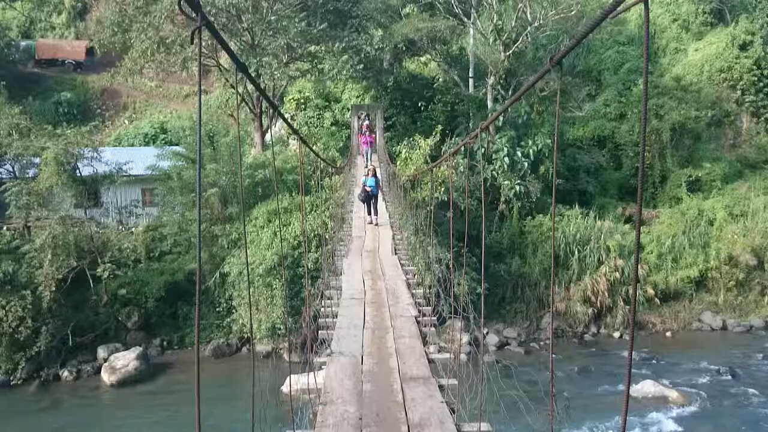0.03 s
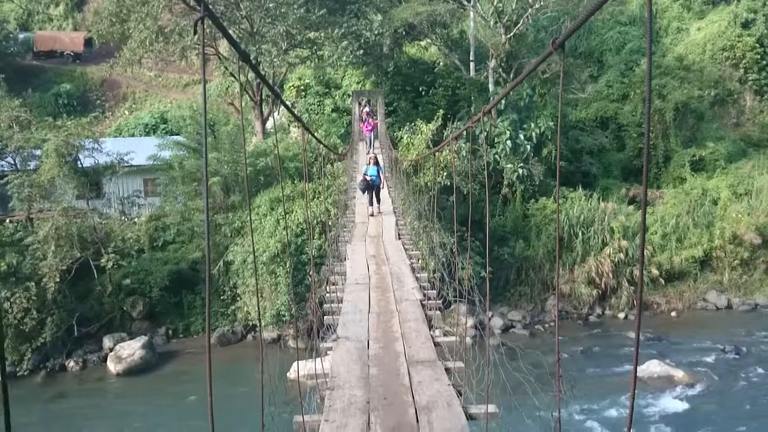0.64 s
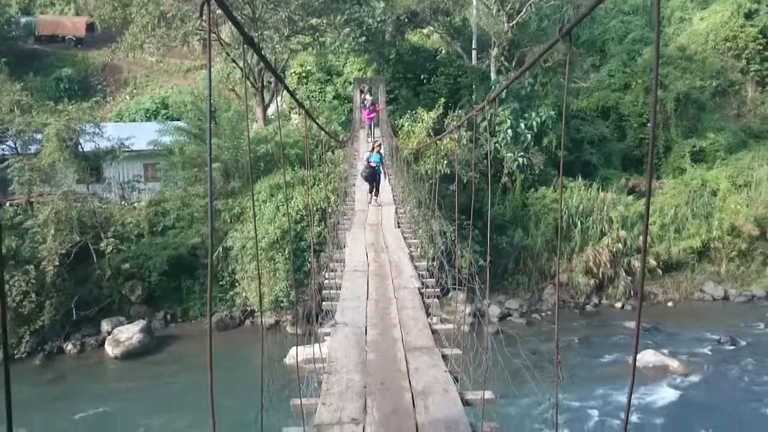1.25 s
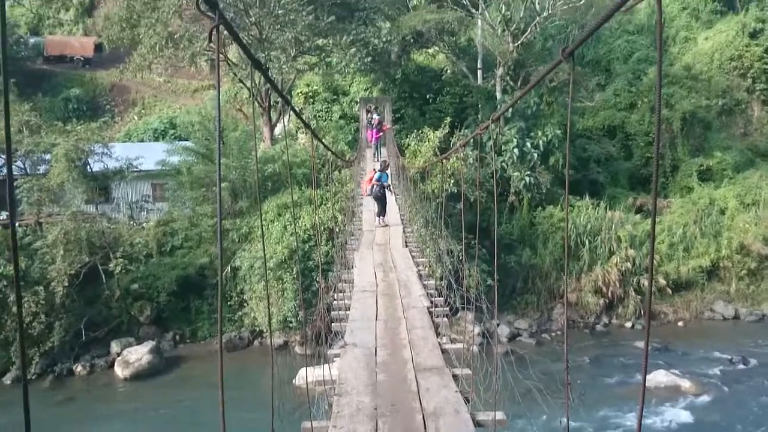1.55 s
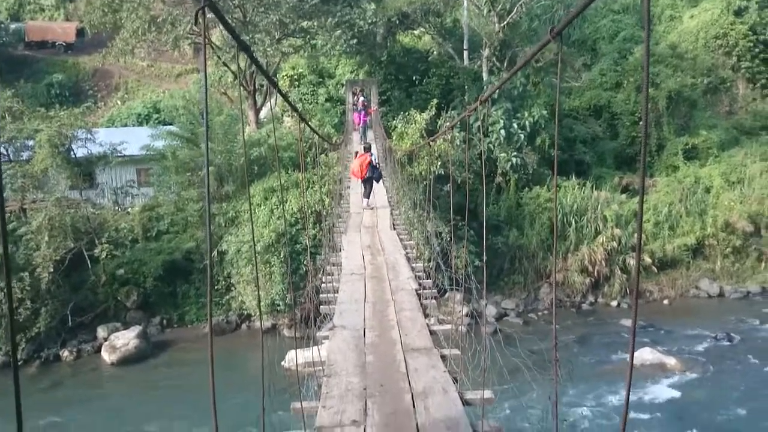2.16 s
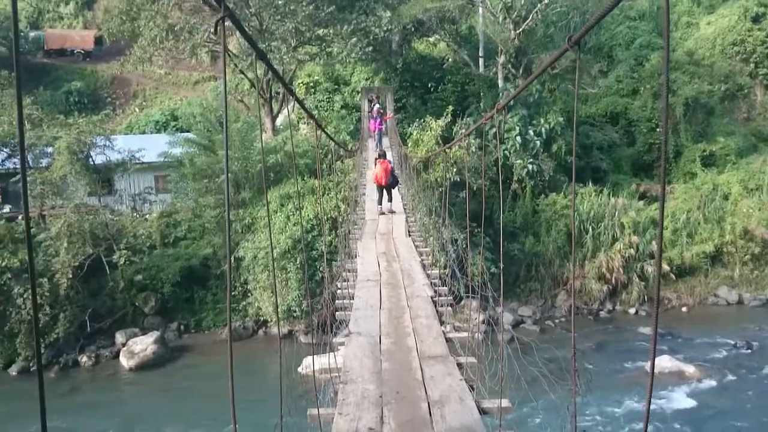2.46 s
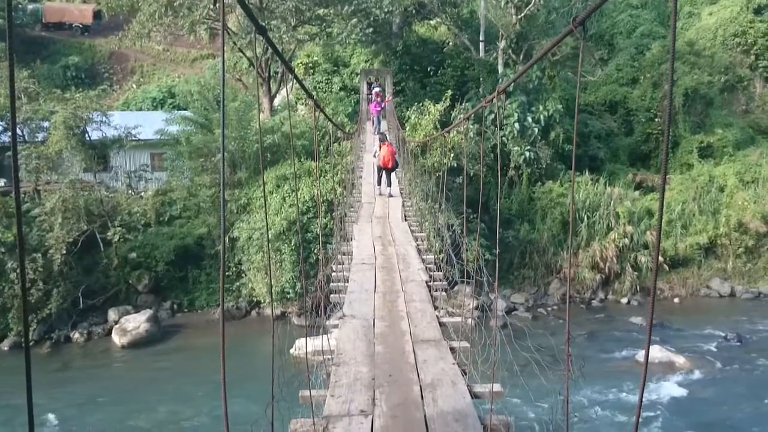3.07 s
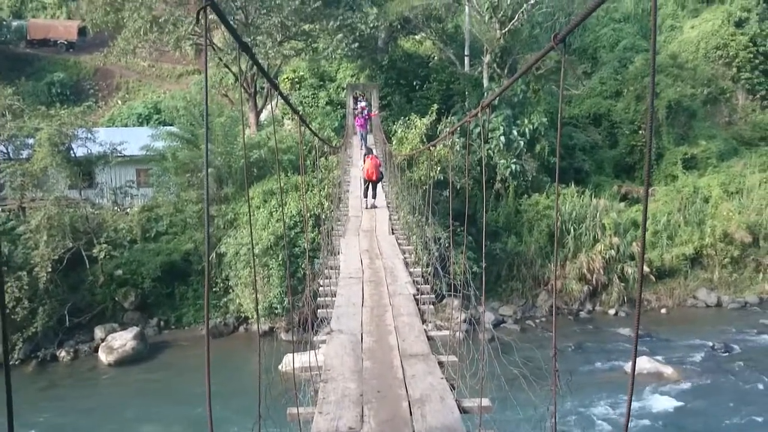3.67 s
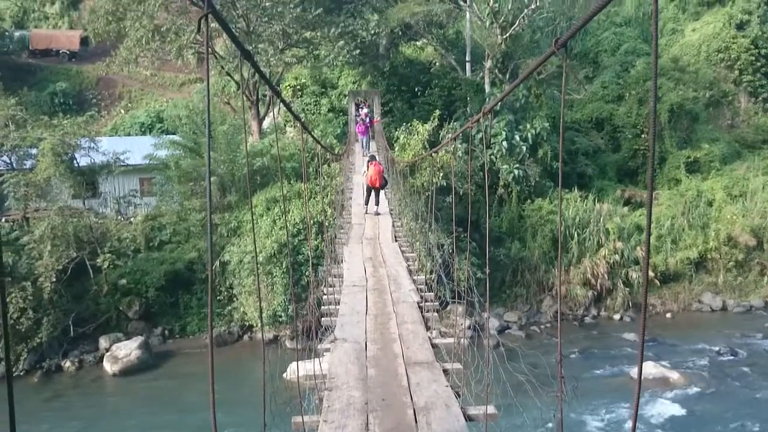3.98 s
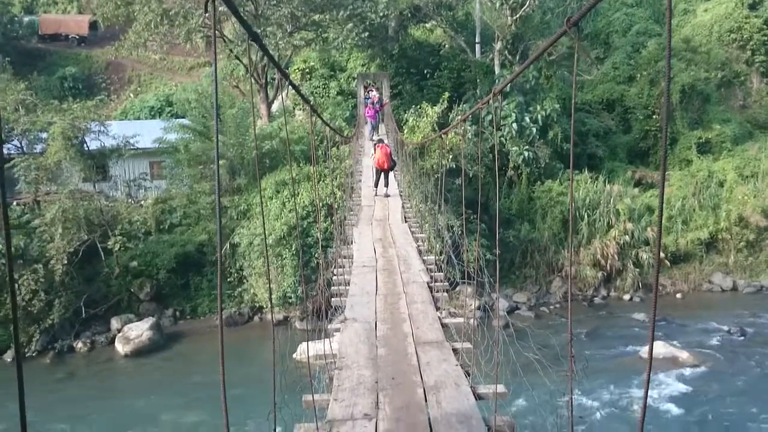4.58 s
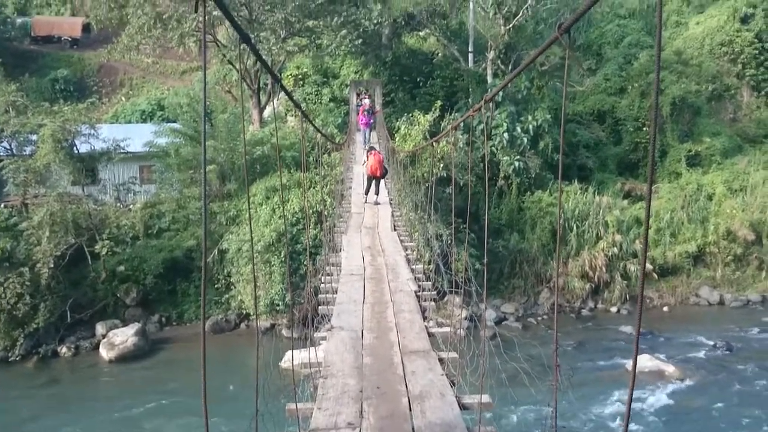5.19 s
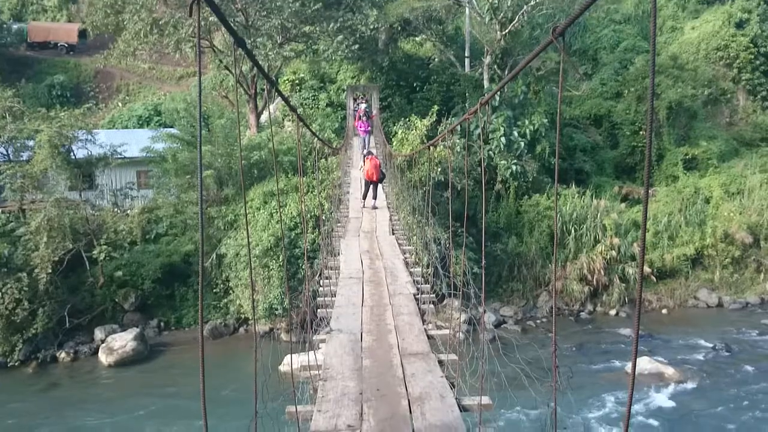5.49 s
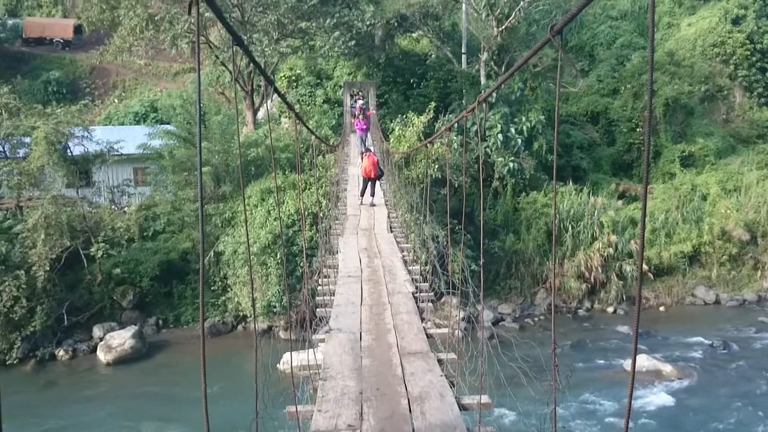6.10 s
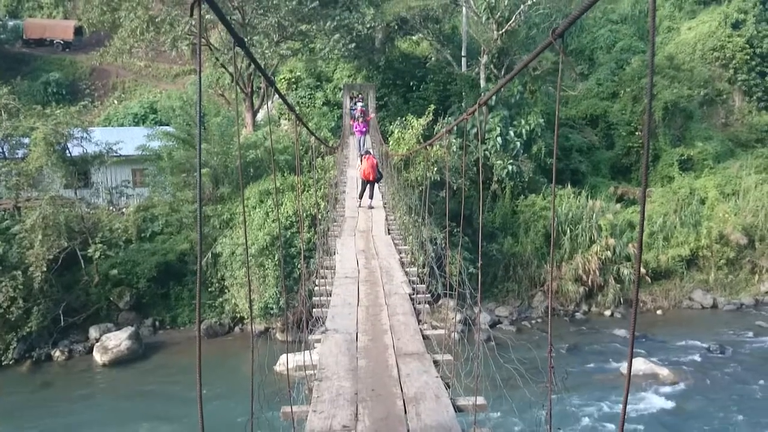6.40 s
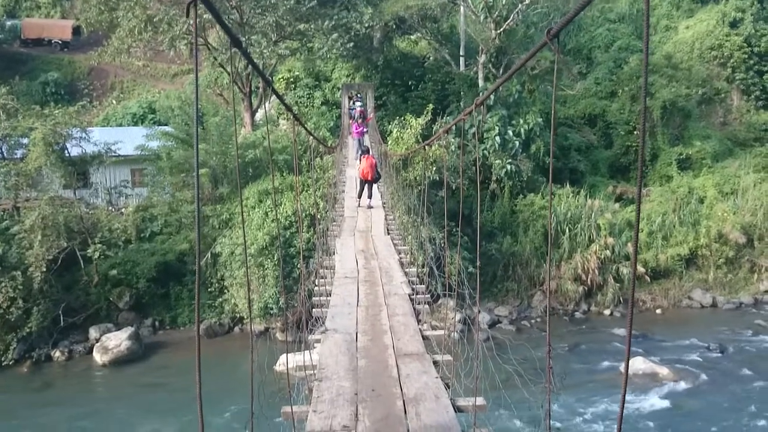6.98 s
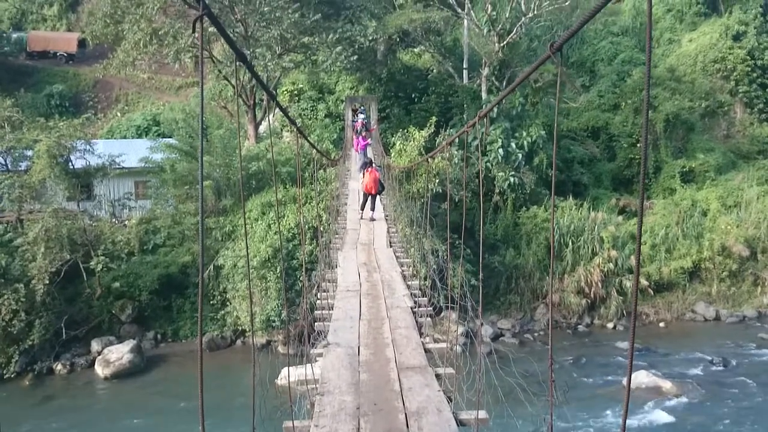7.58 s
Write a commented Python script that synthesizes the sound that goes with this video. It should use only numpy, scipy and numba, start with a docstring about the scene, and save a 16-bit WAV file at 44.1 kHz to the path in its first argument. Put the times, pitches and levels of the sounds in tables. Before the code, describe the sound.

A river rushes steadily over rocks below a footbridge, with one brief thump of wind on the microphone near the end.

```python
"""Below a footbridge, a river rushes over rocks, its rapids off to one side of a hand-held phone.
Churning white water and countless ringing bubbles reach two microphones, each with its own port
resonance; the low roar swells and sinks, and the hiss changes colour in three steps.
A breeze rocks the right microphone, one gust briefly overloads it, and the hand softly bumps the case."""
import sys
import numpy as np
from scipy import signal
from scipy.fft import rfft, irfft, next_fast_len
from scipy.io import wavfile
from scipy.ndimage import uniform_filter1d
from numba import njit

SR = 44100
rng = np.random.default_rng(int(sys.argv[2]) if len(sys.argv) > 2 else 0)


def wav_out(sig):
    """Save sig, one row per channel (or a flat mono array), as 16-bit PCM at SR to the path in sys.argv[1]."""
    wavfile.write(sys.argv[1], SR, np.round(np.clip(np.atleast_2d(sig).T, -1, 1) * 32767).astype(np.int16))


N = 346185
TIME = np.arange(N) / SR
FREQ = np.maximum(np.arange(N // 2 + 1) * SR / N, 1)


def undb(db):
    """Decibels to gain."""
    return 10 ** (np.asarray(db) / 20)


def curve(rows):
    """Join (f/Hz, value) points on a log-frequency axis."""
    hz, value = np.transpose(rows)
    return np.interp(np.log(FREQ), np.log(hz), value)


def eq(x, response):
    """Filter by a frequency response."""
    return irfft(rfft(x) * response, N)


def lowpass(hz, order=2):
    """Response that rolls off above hz."""
    return 1 / (1 + (FREQ / hz) ** order)


def resonance(hz, width_hz):
    """Response of a resonator, 1 at its peak."""
    return 1 / (1 + 1j * (FREQ / hz - hz / FREQ) * hz / width_hz)


def unit(x):
    """Scale to rms 1."""
    return x / np.std(x)


def wander(rate_hz):
    """Modulator that slides from one random level to the next; spread 1."""
    hold = int(SR / rate_hz)
    steps = np.repeat(rng.standard_normal(N // hold + 2), hold)
    return unit(uniform_filter1d(steps[rng.integers(hold):][:N], hold))


def hand_bumps():
    """A soft finger gives the case a rounded push, heard on the nearer microphone."""
    # pushes on the case: t/s, pressure/full scale, half width/s, pan (0 left, 1 right)
    bumps = [(5.919, 0.098, 0.0013, 0.9), (6.464, 0.12, 0.003, 0), (7.625, 0.05, 0.0042, 1)]
    out = np.zeros((2, N))
    for t, pressure, width, pan in bumps:
        out += np.outer([1 - pan, pan], pressure * np.exp(-((TIME - t) / width) ** 2))
    return out


def breeze(light_air_db=-28, fade_in_s=0.5):
    """Slow eddies, almost too deep to hear, come in puffs over light air."""
    # puffs of air: peak t/s, half width/s, rms level/dB
    puffs = [(0.46, 0.12, -13.5), (0.97, 0.19, -18), (1.42, 0.19, -17), (2.18, 0.47, -20.5),
             (3.85, 0.54, -32.5), (4.41, 0.087, -21), (5.05, 0.37, -23), (6.22, 0.036, -15),
             (6.6, 0.18, -22), (7.35, 0.64, -24)]
    puffing = sum(undb(db) * np.exp(-((TIME - t) / width) ** 2) for t, width, db in puffs)
    fade_in = np.minimum(TIME / fade_in_s, 1) ** 2
    eddies = unit(eq(rng.standard_normal(N), resonance(hz=5.53, width_hz=2.4) * lowpass(hz=11)))
    return eddies * (undb(light_air_db) + puffing) * fade_in


def gust():
    """Each shove of air builds and ebbs, rounded by the port."""
    # shoves of air: t/s, length/s, pressure before overload/full scale, rise/s, fall/s
    shoves = [(6.2805, 0.0327, -1.03, 0.0013, 0.0048), (6.323, .0565, 1.02, 0.0044, 0.0016),
              (6.385, 0.068, -1.17, 0.010, 0.013)]
    push = np.zeros(N)
    for start, length, pressure, rise, fall in shoves:
        build = 1 - np.exp(-np.maximum(TIME - start, 0) / rise)
        ebb = np.exp(-np.maximum(TIME - start - length, 0) / fall)
        push += pressure * build * ebb
    return eq(push, lowpass(hz=520))


def wind(shelter_db=-34):
    """Breeze and gust press on the right port; the sheltered left gets a trace of the breeze."""
    sway = breeze()
    return np.array([undb(shelter_db) * sway, sway + gust()])


def diaphragm_knocks():
    """The right diaphragm hits its stop as a shove lands or lets go: a short, hard thump."""
    # thumps: t/s, pressure/full scale, rise/s
    knocks = [(6.2808, -0.17, 0.00088), (6.3272, 0.11, 0.0025), (6.3785, 0.13, 0.0013)]
    out = np.zeros((2, N))
    for t, pressure, rise in knocks:
        age = np.maximum(TIME - t, 0) / rise
        out[1] += pressure * age * np.exp(1 - age)
    return out


def buffeting(overload, flutter_db=-27):
    """Small eddies shake the diaphragm for as long as it is pressed flat."""
    flutter = unit(eq(rng.standard_normal(N), lowpass(hz=70)))
    return undb(flutter_db) * np.sqrt(overload) * flutter


@njit
def ring_bubbles(starts, hz, gains, cycles, glide):
    """Each bubble is a dying sine whose pitch climbs as it nears the surface."""
    out = np.zeros(N)
    for k in range(len(starts)):
        length, phase = int(cycles * SR / hz[k]), 0.
        for i in range(min(length, N - starts[k])):
            age = i / length
            phase += 2 * np.pi * hz[k] * (1 + glide * age) / SR
            out[starts[k] + i] += gains[k] * np.exp(-5 * age) * np.sin(phase)
    return out


def bubbles(count=16000, low_hz=300, high_hz=7000, spread_db=0.5):
    """A wash of bubbles of all sizes; distance lets none stand far out."""
    when, pitch, luck = rng.random((count, 3)).T
    starts = (when * N).astype(np.int64)
    hz = low_hz * (high_hz / low_hz) ** pitch
    accent_db = -spread_db * np.log(np.maximum(luck, .01))
    gains = undb(accent_db) * hz  # the short, high rings are struck harder
    return unit(ring_bubbles(starts, hz, gains, cycles=16., glide=0.13))


def churn(flicker_hz=14, surge_db=-0.26, surge_hz=4, bands=12):
    """Bubble clouds of each size, one noise band apiece, flicker alone and surge together."""
    edges_hz = np.geomspace(100, SR / 2, bands)
    size = next_fast_len(N)
    noise = rfft(rng.standard_normal(size))
    band_of_bin = np.searchsorted(edges_hz[:-1], np.arange(len(noise)) * SR / size)
    flicker_db = np.linspace(1, .25, bands)  # small bubbles are so many that their hiss evens out
    clouds = np.zeros(N)
    for k in range(bands):
        cloud = irfft(noise * (band_of_bin == k), size)[:N]
        clouds += cloud * undb(flicker_db[k] * wander(flicker_hz))
    return unit(clouds * undb(surge_db * wander(surge_hz)))


def white_water(bubble_db=-11):
    """Spectrum of one stretch of churn and bubbles, roughly flat at 0 dB per Hz."""
    return rfft(churn() + undb(bubble_db) * bubbles()) * np.sqrt(SR / 2)


def mic_port(hz, width_hz, lift_db):
    """The air in a microphone port rings and lifts one band."""
    return abs(1 + (undb(lift_db) - 1) * resonance(hz, width_hz))


def swell_roar(water):
    """The river's low roar swells and sinks about its usual level."""
    # swells (+) and lulls (-): centre t/s, half width/s, level/dB
    swells = [(0.12, 0.24, -1.5), (1.15, 0.91, 2), (3.1, 0.7, -1.0), (4.25, 0.51, 0.9)]
    ride_db = sum(db * np.exp(-((TIME - t) / width) ** 2) for t, width, db in swells)
    roar = eq(water, lowpass(hz=1100, order=4))
    return water + roar * (undb(ride_db - ride_db.mean()) - 1)


def step_hiss(water, ramp_s=0.12, order=14):
    """Each step turns one band of the hiss up or down, and there it stays."""
    # colour steps: t/s, low f/Hz, high f/Hz, left change/dB, right change/dB
    steps = [(1.97, 1000, 6900, -2.5, -2.5), (4.97, 6600, 20000, -5, -4.2), (6.47, 2050, 6900, -0.5, 2)]
    for t, low_hz, high_hz, *change_db in steps:
        highpass = 1 / (1 + (low_hz / FREQ) ** order)
        band = eq(water, highpass * lowpass(high_hz, order))
        ramp = np.clip((TIME - t) / ramp_s + .5, 0, 1)
        water = water + band * (undb(np.outer(change_db, ramp - ramp.mean())) - 1)
    return water


def river(lag_s=0.000475, spacing_s=0.00037):
    """The rapids reach the left microphone first; the wash from all around is alike only in the bass."""
    # tone of the river at each microphone, ahead of the port: f/Hz, level/dB per Hz
    left_tone = [(55, -86), (200, -68), (420, -73.5), (620, -70), (1000, -77), (1200, -73.5), (1600, -78.5),
                 (5000, -81.5), (9800, -85), (11800, -84.5), (12800, -106), (14200, -91.5), (16000, -99)]
    right_tone = [(90, -70), (200, -66.5), (350, -69), (520, -74.5), (770, -70.5), (1000, -74.5),
                  (1270, -73.5), (1650, -76), (2200, -73.5), (4000, -80), (7000, -85.5), (10300, -96.5),
                  (13300, -97.5), (14300, -92.5), (16000, -99)]
    # port resonances: f/Hz, width/Hz, lift/dB
    left_port = (7835, 970, 10.73)
    right_port = (5910, 573, 14.64)
    # sound straight from the rapids: f/Hz, share of power (0-1)
    direct_share = [(100, 0.38), (250, 0.54), (460, 0.51), (620, 0), (950, 0.22), (1400, 0.37),
                    (2400, 0.58), (4000, 0.07), (5500, 0.15), (9000, 0)]
    direct = curve(direct_share)
    coherence = np.sinc(2 * FREQ * spacing_s)
    rapids = np.sqrt(direct) * white_water()
    late_rapids = rapids * np.exp(-2j * np.pi * FREQ * lag_s)
    mid = np.sqrt((1 - direct) * (1 + coherence) / 2) * white_water()
    side = np.sqrt((1 - direct) * (1 - coherence) / 2) * white_water()
    left = (mid + side + rapids) * undb(curve(left_tone)) * mic_port(*left_port)
    right = (mid - side + late_rapids) * undb(curve(right_tone)) * mic_port(*right_port)
    return irfft(np.array([left, right]), N)


def scene():
    """River, wind and hand at the two microphones."""
    return step_hiss(swell_roar(river())) + wind() + hand_bumps()


def record(dry, ceiling=0.79, hardness=4.8, start_s=0.115, top_hz=15650):
    """Overload flattens the gust and chokes the river under it; the sound cuts in, its top rolled off."""
    gain = (1 + abs(dry / ceiling) ** hardness) ** (-1 / hardness)
    pressed = dry * gain + buffeting(1 - gain) + diaphragm_knocks()
    high_cut = signal.ellip(10, .1, 80, top_hz, fs=SR, output="sos")
    return signal.sosfilt(high_cut, pressed * (TIME >= start_s))


dry = scene()
out = record(dry)
wav_out(out)
```